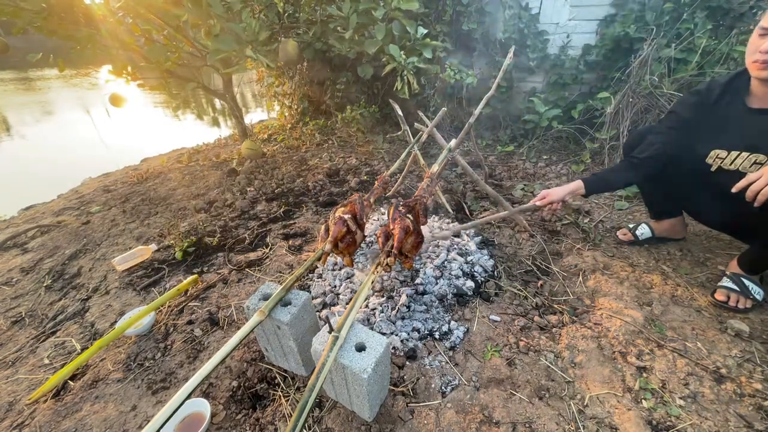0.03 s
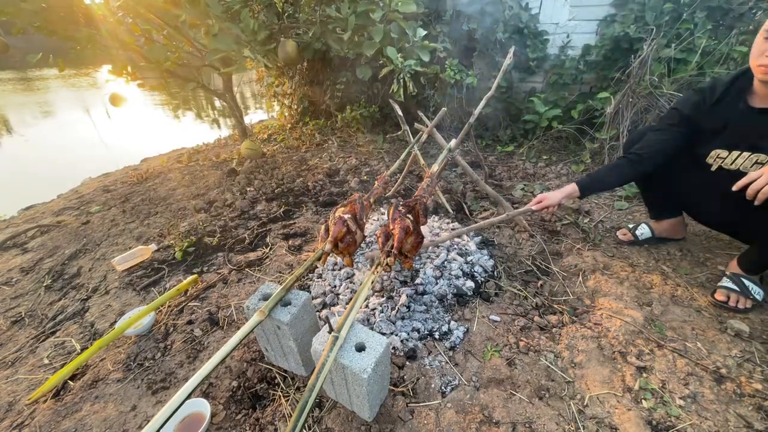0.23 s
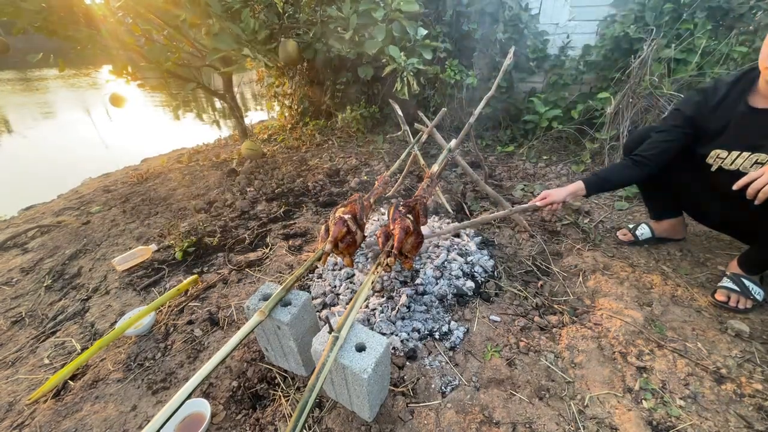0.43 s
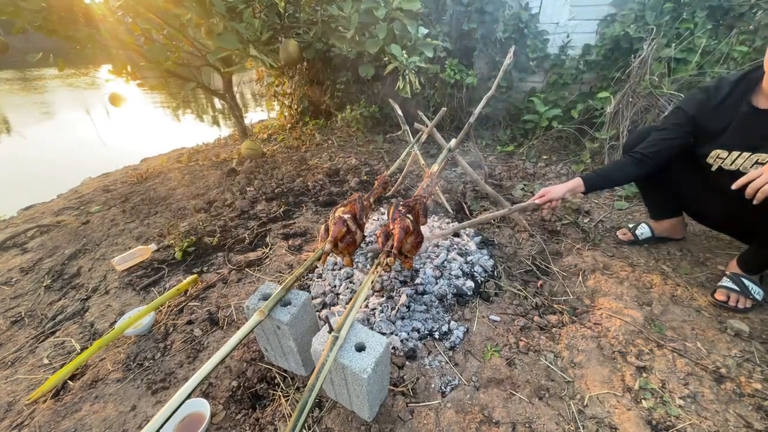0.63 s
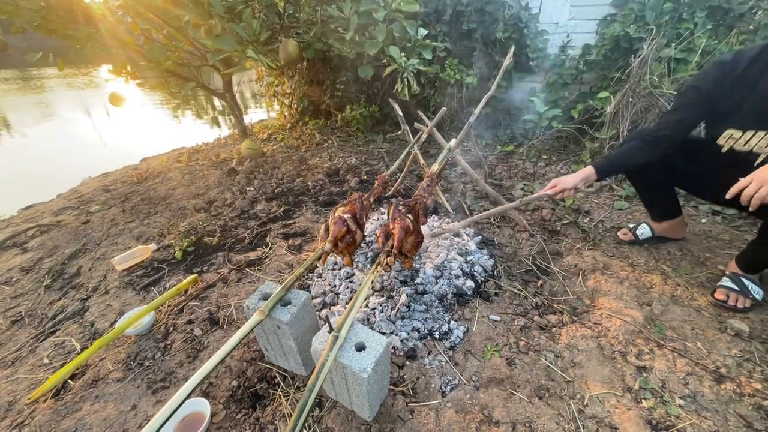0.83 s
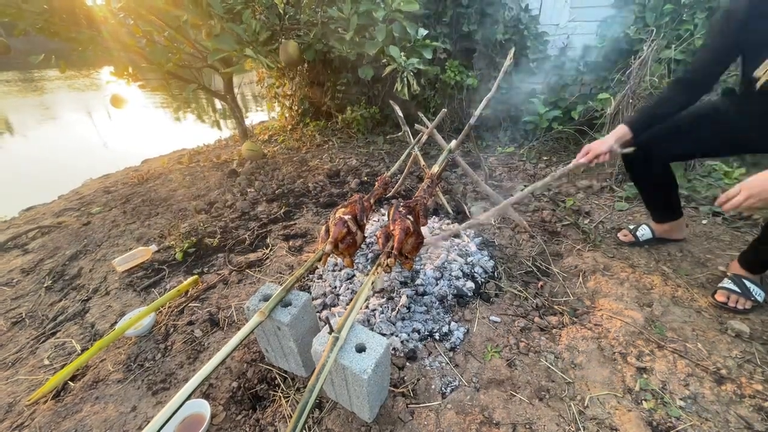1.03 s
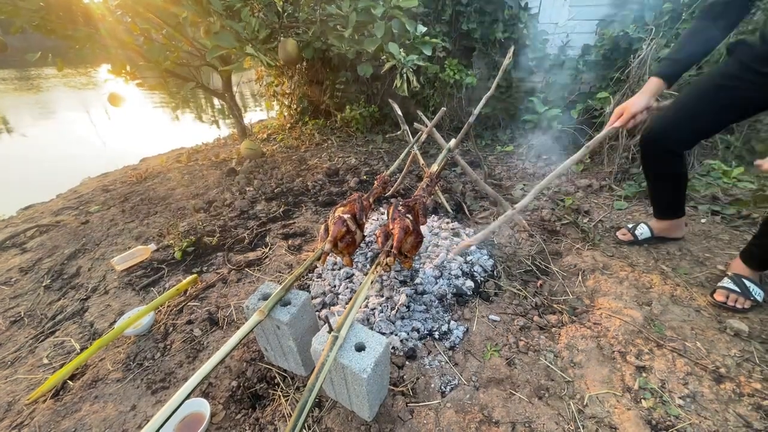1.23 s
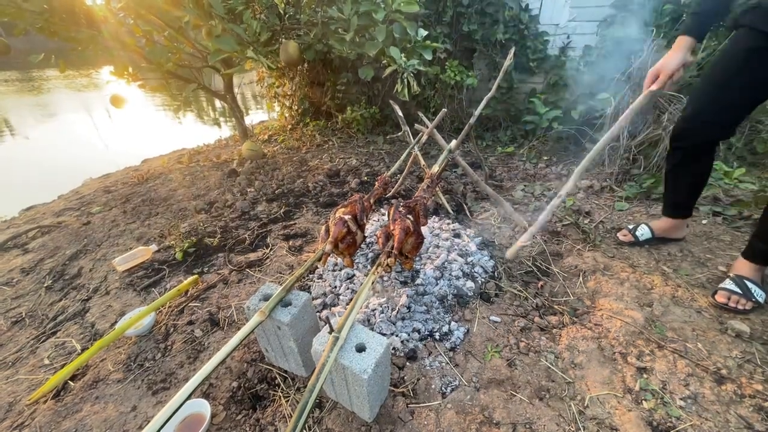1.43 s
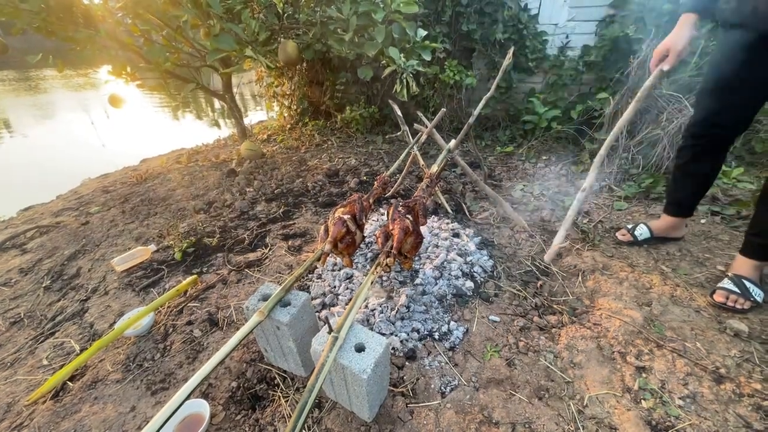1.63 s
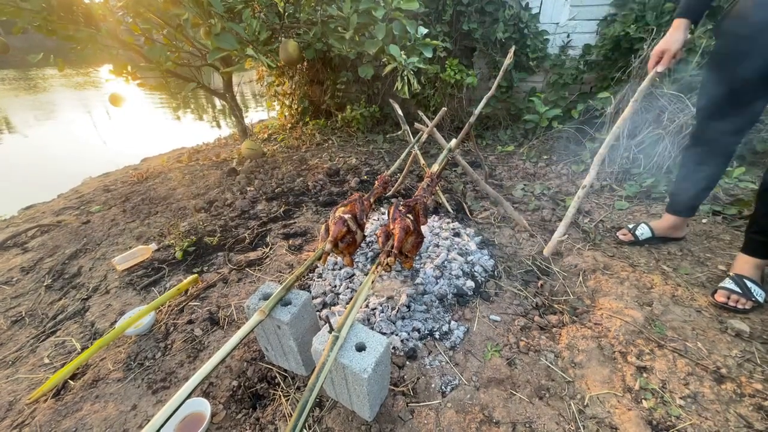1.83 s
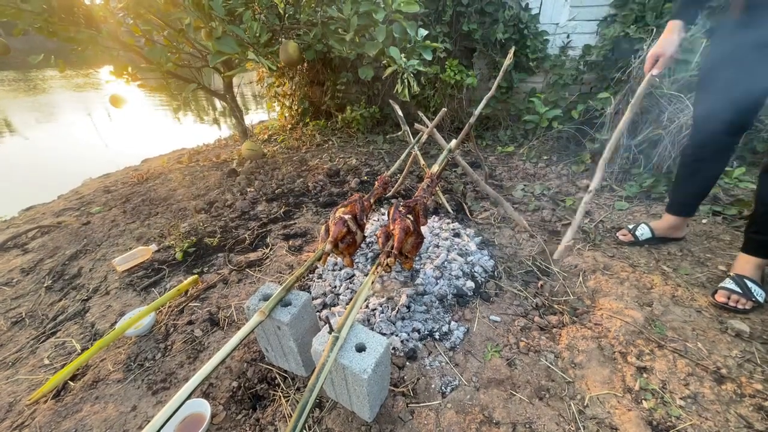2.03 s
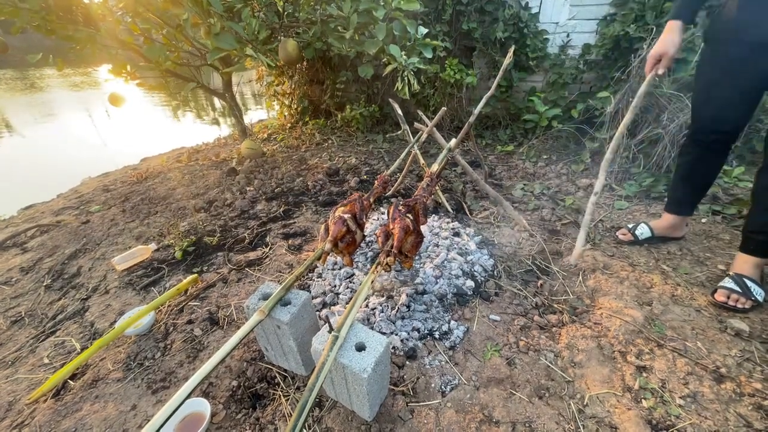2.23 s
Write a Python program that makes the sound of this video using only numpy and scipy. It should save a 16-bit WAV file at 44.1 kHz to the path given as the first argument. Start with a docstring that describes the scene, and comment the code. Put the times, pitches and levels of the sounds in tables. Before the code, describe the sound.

Wind buffets the microphone in low puffs while a stick pokes faintly crackling coals.

```python
"""An insect buzzes faintly in the bushes of a river bank, one chirp to each wing stroke. A stick pokes a
bed of coals, which fracture in two sharp crackles, then in small ticks, while the stirred embers sizzle.
All the while, eddies of wind strike the microphone in low, falling puffs over a rumble. As the wind
drops, the stick is drawn away over dry earth with a soft scuff, and at the end a bird calls far off."""
import sys
import numpy as np
from scipy import signal
from scipy.fft import rfft, irfft, next_fast_len
from scipy.io import wavfile
from scipy.ndimage import map_coordinates

SR = 44100
rng = np.random.default_rng(int(sys.argv[2]) if len(sys.argv) > 2 else 0)


def pcm_store(signal):
    """Save signal as 16-bit PCM."""
    levels = np.round(np.clip(np.atleast_2d(signal), -1, 1) * 32767)
    wavfile.write(sys.argv[1], SR, levels.astype(np.int16).T)


N = 105840

# Fractures in the coals. Each row: start in seconds, level in dB, 60 dB decay time in seconds,
# tilt in dB per octave, ring of the piece in Hz.
FRACTURES = [(0.2, -34.5, 0.042, -1.5, 2930), (0.204, -33, .03, -7.5, 3100), (0.204, -26, 0.041, 0, 3730),
             (0.397, -46, 0.024, 4, 13000), (0.461, -42, .015, 5, 14800), (0.5013, -34.5, 0.04, -4.5, 1580),
             (.5045, -41, 0.057, 7.5, 5500), (0.5059, -26.5, 0.0081, 5.5, 9650),
             (0.5093, -22, 0.0094, 6, 9960), (0.5127, -31, 0.0083, -0.5, 10300),
             (0.633, -34, 0.0054, 8, 12500), (.6757, -35.5, 0.0079, 0, 8400), (.8076, -55, .01, 0, 9000),
             (0.915, -46, .01, -2, 14000), (.969, -40, 0.015, -3.5, 8000), (1.3794, -46.5, .025, 7, 10700),
             (1.433, -46, .01, 1, 14800), (2.017, -38.5, 0.0046, 1, 10200)]
# Resonances of the coal bed. Each row: centre in Hz, width in Hz, lift in dB.
BED_RESONANCES = [(1516, 49, 9.5), (5200, 120, 2), (9300, 1300, 7)]
# Hiss of the embers. Each row: time in seconds, level in dB.
SIZZLE_LEVELS = [(0, -64.5), (.19, -59), (.23, -47.5), (.33, -58), (.43, -59.5), (.6, -61), (.78, -59.5),
                 (.95, -53.5), (1.02, -62.5), (1.72, -65), (1.76, -55.5), (1.9, -64), (2.4, -61)]
# Scuffs of the stick. Each row: start in seconds, level in dB, rise time and 60 dB decay time in seconds,
# centre of the rasp in Hz.
STICK_SCUFFS = [(1.738, -42, 0.024, 0.38, 2130), (1.785, -49, 0.025, 1.34, 1110),
                (2.16, -53, 0.027, 0.77, 1420), (2.275, -57, 0.0073, 0.16, 2100)]
# Spectra of the coals and the ground. Each row: frequency in Hz, relative level in dB.
FRACTURE_SPECTRUM = [(200, -10), (600, -1.5), (2000, -4.5), (5000, -3), (8500, -5.5), (11000, -8),
                     (14000, -5.5), (16000, -14)]
SIZZLE_SPECTRUM = [(1000, -25), (3000, -4), (6000, -8), (9500, -1), (11000, -7), (14500, 4), (16000, -5.5)]
EARTH_SPECTRUM = [(150, -22), (500, 6), (900, 4), (1400, 2), (2100, 2.5), (3200, 0.5), (5000, -7),
                  (9000, -12), (16000, -22)]

# Eddies striking the microphone. Each row: time in seconds, level in dB, treble roll-off scale in Hz.
EDDIES = [(0.219, -14.5, 35.7), (0.249, -17, 40), (0.281, -21, 60), (0.366, -10.5, 110), (.386, -3, 100),
          (0.4, -9, 45), (0.451, -2.5, 113), (.495, -5.5, 110), (.516, -9, 105), (0.564, 0, 175),
          (.614, -12, 130), (0.73, -10, 50), (0.752, -5.5, 135), (0.805, -7.5, 120), (0.818, -15, 115),
          (0.831, -6, 95), (.866, -8, 141), (0.898, -8.5, 105), (0.921, -3, 80), (0.946, -9.5, 115),
          (0.985, -18, 45), (1.009, -5, 105), (1.147, -3.5, 174), (1.168, -12, 90), (1.184, -6.5, 80),
          (1.229, -8.5, 90), (1.25, -9.5, 32.4), (1.284, -15.5, 91), (1.337, -12, 88), (1.399, -7.5, 119),
          (1.427, -7.5, 60), (1.485, -9, 50), (1.512, -7.5, 95), (1.545, -6, 90), (1.565, -11, 75),
          (1.578, -6, 142), (1.596, -7, 75.5), (1.626, -9, 125), (1.665, 0.5, 110), (1.704, -16, 104),
          (1.788, -13, 65.6), (1.801, -12.5, 39.2)]
# Strength of the wind's rumble. Each row: time in seconds, level in dB.
WIND_LEVELS = [(0, -59), (.12, -37), (.19, -42.5), (.25, -30), (.34, -26.5), (.45, -23), (.62, -23.5),
               (.68, -34.5), (.78, -19.5), (.95, -19.5), (1.09, -23.5), (1.45, -22), (1.73, -21.5),
               (1.8, -27.5), (1.89, -37.5), (2.01, -30), (2.13, -50), (2.28, -36.5), (2.4, -52.5)]
# Flapping in hard gusts. Each row: start in seconds, level in dB, rise and 60 dB decay times in seconds.
GUST_FLUTTERS = [(0.364, -38.5, 0.0077, 0.32), (0.497, -27.5, 0.0036, 0.23), (0.57, -26, 0.0027, 0.14),
                 (0.796, -31.5, 0.024, 0.59), (.925, -49, .008, 0.31), (1.52, -47, 0.036, 0.6)]
# Sharp gust fronts. Each row: start in seconds, level in dB, 60 dB decay time in seconds.
GUST_SLAPS = [(0.454, -29, 0.037), (0.4865, -37, 0.015), (0.563, -25, 0.026)]
# Spectra of the wind and the outdoor air. Each row: frequency in Hz, relative level in dB.
EDDY_SPECTRUM = [(20, -60), (35, -15.5), (60, -3), (100, 0), (200, -2.5), (400, -5.5), (600, -6.5),
                 (1000, -24), (3000, -36)]
RUMBLE_SPECTRUM = [(20, -22), (35, -22), (55, -4), (80, -1.5), (120, -7), (180, -21), (300, -42),
                   (600, -64), (1500, -87)]
CHURN_SPECTRUM = [(70, -26), (130, -1.5), (190, 2), (280, -6.5), (400, -25.5), (700, -46), (1500, -61)]  # upper rumble in strong flow
SWAY_SPECTRUM = [(18, -52), (35, -6), (55, 4.5), (75, 0.5), (110, -14.5), (200, -50), (500, -52)]  # deep rumble of the breeze
FLUTTER_SPECTRUM = [(100, -28), (200, -1), (300, 4), (450, -5), (700, -19), (1100, -34), (2500, -47)]
SLAP_SPECTRUM = [(200, -23), (450, -11), (700, 6.5), (1100, -13.5), (1600, -14.5), (2400, -29), (5000, -43)]
AIR_SPECTRUM = [(30, 16), (150, 11.5), (300, 8.5), (600, 4.5), (1200, 0.5), (2500, -1.5), (5000, -6.5),
                (9000, -5.5), (11000, -12.5), (15000, -12.5)]

# Phrases of the insect. Each row: start in seconds, end in seconds, level in dB.
INSECT_PHRASES = [(-.05, 0.4, -52), (.53, 0.86, -55), (.85, 2.08, -53), (2.235, 2.7, -56)]
# Course of the bird's note. Each row: time in seconds, pitch in Hz, level in dB.
BIRD_NOTE = [(2.309, 1427, -100), (2.35, 1490, -60), (2.4, 1544, -62)]


def crackles():
    """Impulse excitation: each fracture is a noise burst shaped by the resonances of bed and piece."""
    rise_s, ring_db, ring_relative_width = 0.0002, 13, 0.1
    hz = np.fft.rfftfreq(N, 1 / SR)
    bed_db = sum(db * resonance(hz, centre, width) for centre, width, db in BED_RESONANCES)
    bed = spectral_gain(FRACTURE_SPECTRUM, hz) * amp(bed_db)
    grit, spectrum = rng.standard_normal(N), 0
    for start, db, t60, tilt, ring_hz in FRACTURES:
        ring = ring_db * resonance(hz, ring_hz, ring_relative_width * ring_hz)
        piece = unit_rms(bed * amp(tilt * np.log2(hz + 500) + ring))
        excitation = amp(db) * burst(start, rise_s, t60) * grit
        spectrum += rfft(excitation) * minimum_phase(piece)
    direct = irfft(spectrum, N)
    return direct + amp(-15) * foliage_scatter(direct, t60=0.13)


def sizzle():
    """Stirred embers hiss: fast random amplitude modulation gives the noise its fine grain."""
    return envelope(SIZZLE_LEVELS) * grainy(noise(SIZZLE_SPECTRUM), depth_db=3.5, rate=500)


def scuffs():
    """Friction on dry earth makes gritty noise, with a broad rasping peak of its own in each scuff."""
    rasp_db, rasp_octaves = 3, 0.45
    out = np.zeros(N)
    for start, db, rise, t60, rasp_hz in STICK_SCUFFS:
        rasp = lambda hz: amp(rasp_db * np.exp(-(np.log2((hz + 1) / rasp_hz) / rasp_octaves) ** 2))
        friction = filtered(noise(EARTH_SPECTRUM), rasp)
        out += amp(db) * burst(start, rise, t60) * grainy(friction, depth_db=-1, rate=300)
    return out


def puffs():
    """Each eddy is a pressure pulse; group delay holds back its bass and makes it a downward sweep."""
    lag_cycles, lag_knee_hz = 2.01, 32.85
    size = next_fast_len(N + SR // 2)
    hz = np.fft.rfftfreq(size, 1 / SR)
    body, spectrum = spectral_gain(EDDY_SPECTRUM, hz), 0
    for time, db, rolloff_hz in EDDIES:
        pulse = body * np.exp(-hz / rolloff_hz)
        delay = np.exp(-2j * np.pi * hz * time)
        spectrum += amp(db) * pulse / pulse.mean() * delay
    bass_lag = np.exp(-2j * np.pi * lag_cycles * np.log1p(hz / lag_knee_hz))
    return irfft(spectrum * bass_lag, size)[:N]


def rumble():
    """Turbulence grows louder and, by a power law, brighter with the wind, over a deep, steady sway."""
    wind = envelope(WIND_LEVELS)
    churn = amp(-32.5) * (wind / wind.max()) ** 1.39 * noise(CHURN_SPECTRUM)
    return wind * noise(RUMBLE_SPECTRUM) + churn + amp(-39.5) * noise(SWAY_SPECTRUM)


def flutter():
    """Unsteady flow tears at the microphone: hard gusts slap at their fronts and flap raggedly."""
    flaps = sum(amp(db) * burst(start, rise, t60) for start, db, rise, t60 in GUST_FLUTTERS)
    slaps = sum(amp(db) * burst(start, 0.00065, t60) for start, db, t60 in GUST_SLAPS)
    ragged = grainy(noise(FLUTTER_SPECTRUM), depth_db=1.5, rate=90)
    return flaps * ragged + slaps * noise(SLAP_SPECTRUM)


def insect():
    """A pulse train is heard as a buzz: each wing stroke is a tiny falling chirp."""
    wing_hz, top_hz, fall_hz = 80.1, 8626, 2300
    stroke_half_width, fade_s = 0.24, 0.02
    t = np.arange(N) / SR
    stroke = (t * wing_hz) % 1
    pitch = top_hz - fall_hz * stroke + 170 * wobble(700)
    chirps = tone(pitch) * np.exp(-((stroke - 0.5) / stroke_half_width) ** 2)
    phrases = sum(amp(db) * np.clip(np.minimum(t - start, end - t) / fade_s + 0.5, 0, 1)
                  for start, end, db in INSECT_PHRASES)
    song = chirps * phrases * amp(1.1 * wobble(58.9))
    return song + amp(-9.5) * foliage_scatter(song, t60=0.04)


def bird():
    """A distant call is one faint pure tone that glides slightly upward."""
    times, hz, db = np.transpose(BIRD_NOTE)
    t = np.arange(N) / SR
    return amp(np.interp(t, times, db)) * tone(np.interp(t, times, hz))


def foliage_scatter(x, t60):
    """Diffuse scattering in the bushes: convolution with a decaying noise tail of unit energy."""
    tail = rng.standard_normal(N) * burst(0, 0.0013, t60)
    return signal.fftconvolve(x, tail / np.linalg.norm(tail))[:N]


def amp(db):
    """Amplitude ratio of a level in decibels."""
    return 10 ** (np.asarray(db) / 20)


def unit_rms(x):
    """Normalisation to a mean square of 1."""
    return x / np.sqrt(np.mean(x ** 2) + 1e-20)


def spectral_gain(points, hz):
    """Gain interpolated in decibels along a logarithmic frequency axis."""
    frequencies, db = np.transpose(points)
    return amp(np.interp(np.log(hz + 1), np.log(frequencies + 1), db))


def resonance(hz, centre, width):
    """A Lorentzian peak of height 1, its width taken at half height."""
    return 1 / (1 + (2 * (hz - centre) / width) ** 2)


def minimum_phase(gain):
    """Causality: a phase from the Hilbert transform of log gain puts the ringing after its impulse."""
    log_gain = np.log(np.r_[gain, gain[-2:0:-1]])
    return np.exp(np.conj(signal.hilbert(log_gain))[:len(gain)])


def envelope(rows):
    """Gain interpolated in decibels over time."""
    return amp(np.interp(np.arange(N) / SR, *np.transpose(rows)))


def burst(start, rise, t60):
    """An exponential rise times a decay of 60 dB in t60 seconds."""
    t = np.maximum(np.arange(N) / SR - start, 0)
    return (1 - np.exp(-t / rise)) * np.exp(-np.log(1000) * t / t60)


def tone(hz):
    """A sine whose phase is the integral of its frequency."""
    return np.sin(2 * np.pi * np.cumsum(hz) / SR)


def wobble(rate):
    """A spline through random values, rate of them a second."""
    knots = rng.standard_normal(int(N * rate / SR) + 4)
    return map_coordinates(knots, [np.arange(N) * rate / SR])


def grainy(x, depth_db, rate):
    """Random amplitude modulation, scaled to rms 1."""
    return unit_rms(x * amp(depth_db * wobble(rate)))


def filtered(x, response):
    """Linear filtering: the spectrum times a frequency response."""
    size = next_fast_len(N + SR // 2)
    return irfft(rfft(x, size) * response(np.fft.rfftfreq(size, 1 / SR)), size)[:N]


def noise(points):
    """White noise filtered to a given spectrum, at rms 1."""
    return unit_rms(filtered(rng.standard_normal(N), lambda hz: spectral_gain(points, hz)))


def scene():
    """Superposition: wind, coals, ground and wildlife add to quiet outdoor air in one channel."""
    wind = puffs() + rumble() + flutter()
    sources = wind + crackles() + sizzle() + scuffs() + insect() + bird()
    air = amp(-53) * noise(AIR_SPECTRUM)
    return (sources + air)[None]


def record(dry):
    """Band limiting: an ideal low-pass filter removes the highest treble."""
    cutoff_hz = 15900
    return np.array([filtered(channel, lambda hz: hz < cutoff_hz) for channel in dry])


dry = scene()
out = record(dry)
pcm_store(out)
```